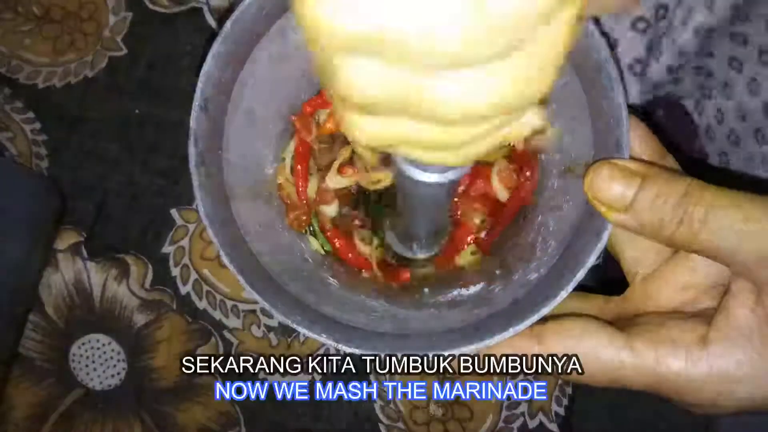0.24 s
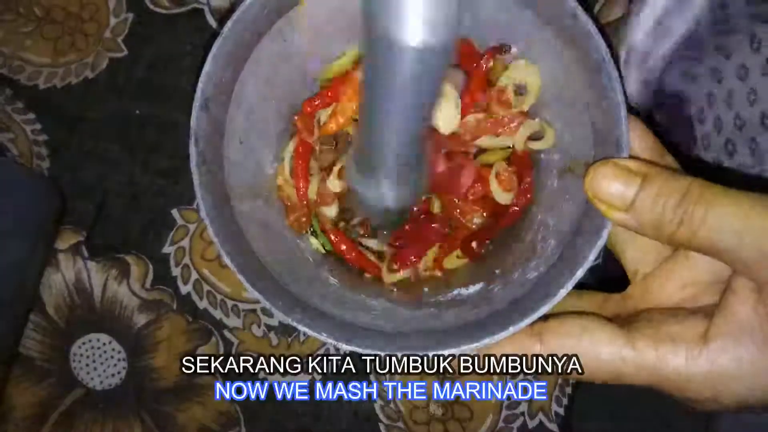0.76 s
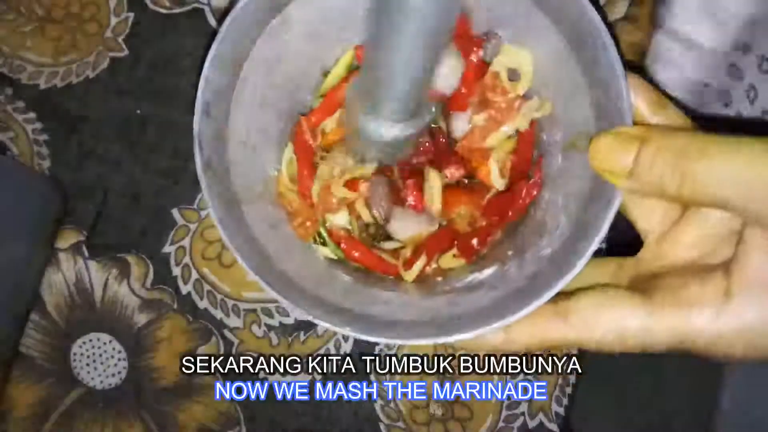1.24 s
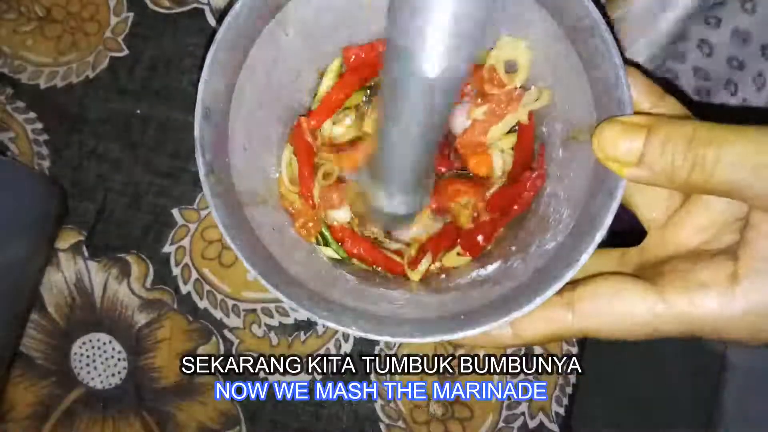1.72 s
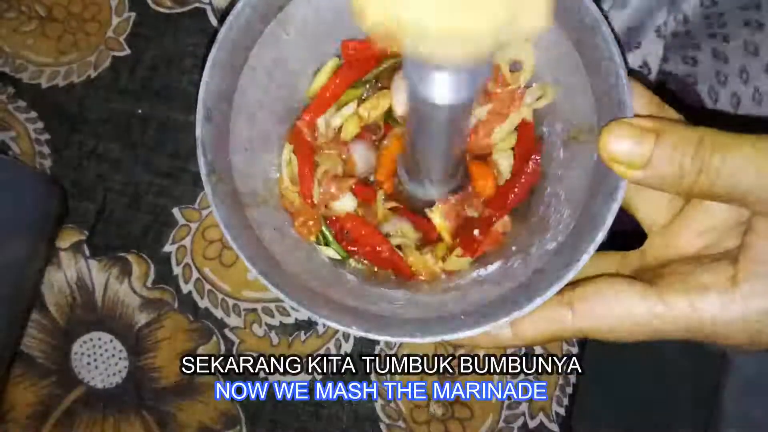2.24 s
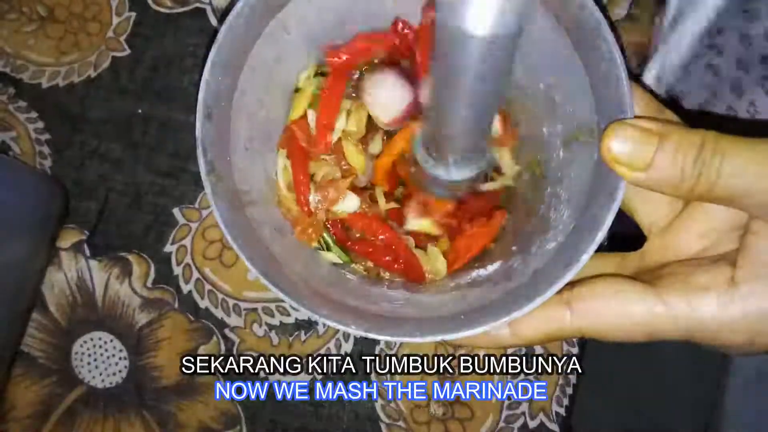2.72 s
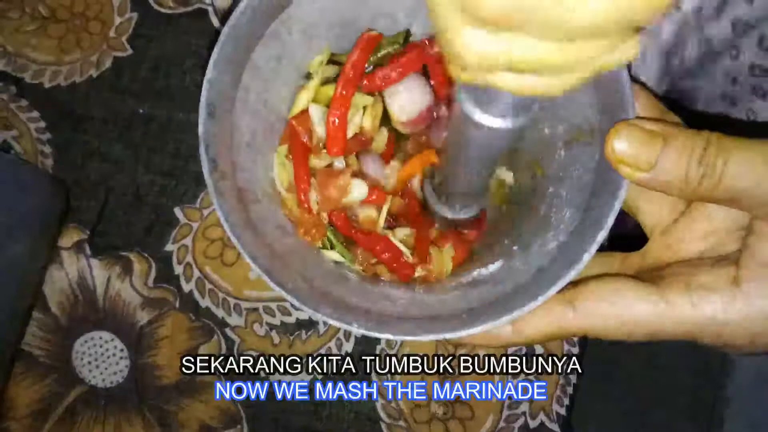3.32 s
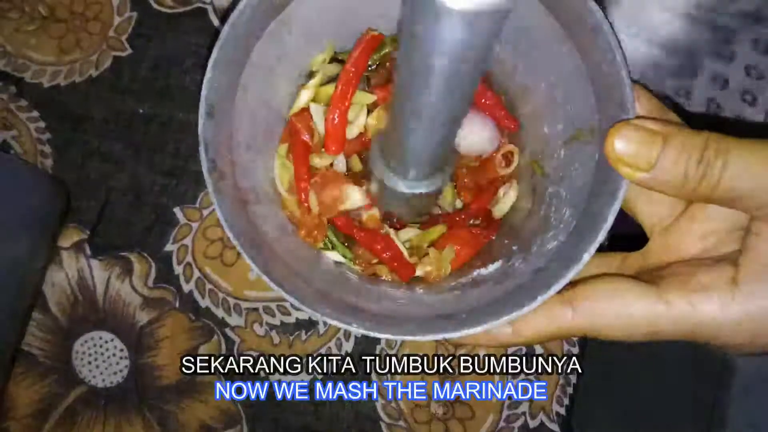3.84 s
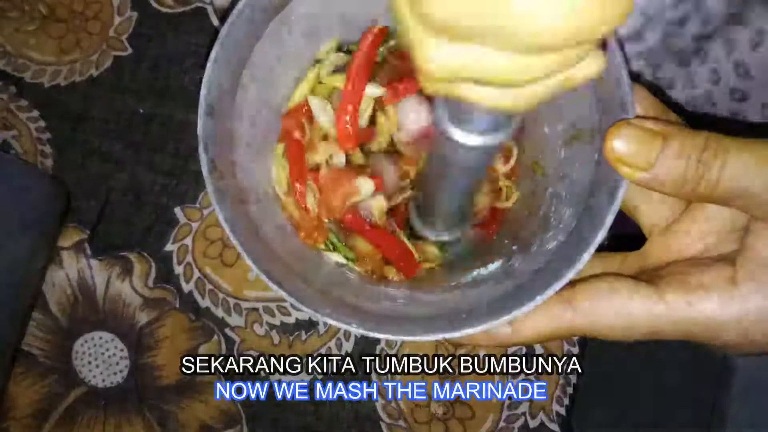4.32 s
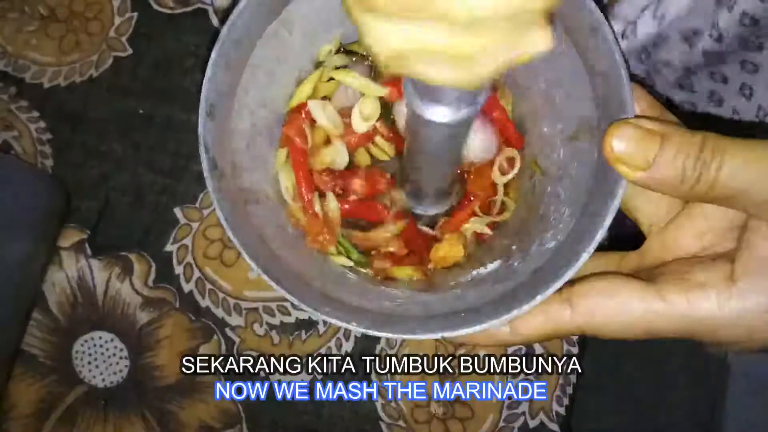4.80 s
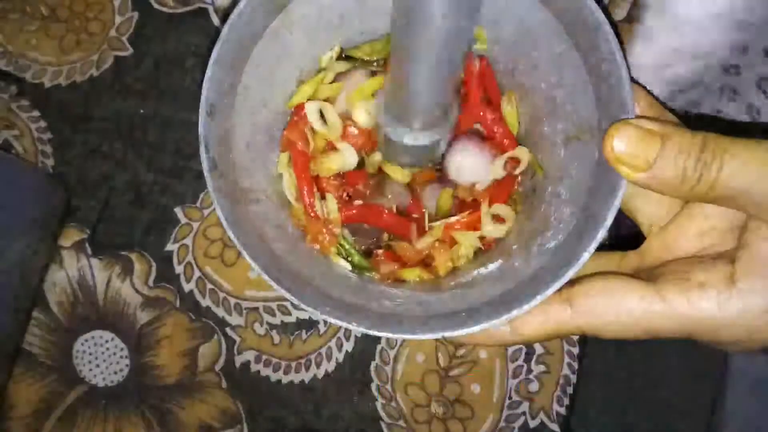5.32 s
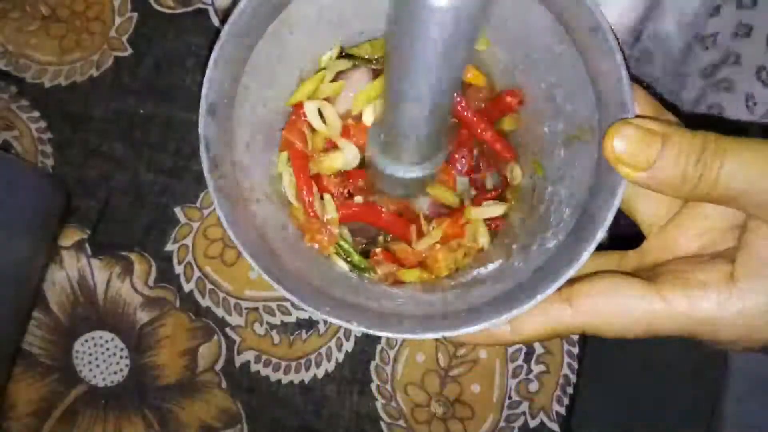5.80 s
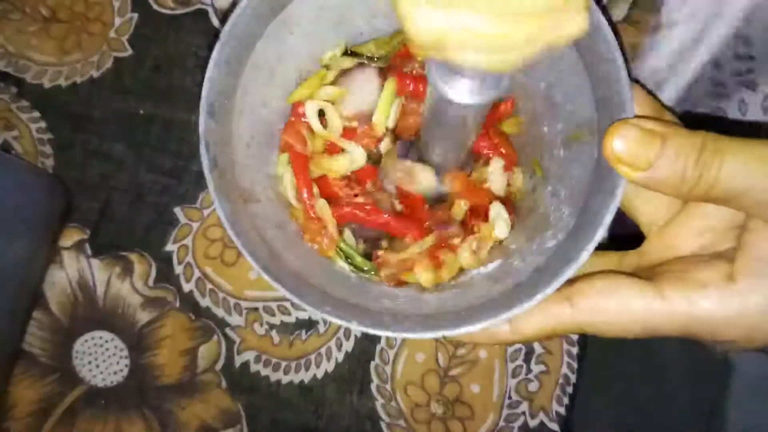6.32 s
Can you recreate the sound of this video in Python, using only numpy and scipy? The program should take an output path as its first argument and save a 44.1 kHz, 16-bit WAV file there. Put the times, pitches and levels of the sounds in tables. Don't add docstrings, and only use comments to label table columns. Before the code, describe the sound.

Steady hand pounding in a small, hard kitchen, heard close up. The tail of an earlier blow opens the scene, then a metal pestle strikes the mortar wall with a short, held-back ring. Regular thuds follow, each preceded by wet crunching and popping, with damped metallic clanks here and there. A clearer ring comes past the middle, and pounding continues to the end over constant hiss and short lively echoes.

```python
import sys
import numpy as np
from scipy import signal
from scipy.fft import irfft
from scipy.io import wavfile
from scipy.ndimage import uniform_filter1d

SR = 44100
rng = np.random.default_rng(int(sys.argv[2]) if len(sys.argv) > 2 else 0)


def transcribe(signal):
    frames = np.atleast_2d(signal).T
    limited = np.clip(frames, -1, 1)
    pcm = np.round(limited * 32767).astype(np.int16)
    wavfile.write(sys.argv[1], SR, pcm)


def rack_gain(trim_db):
    fader = np.asarray(trim_db, float)
    return 10 ** (fader / 20)


N = 289296
LEAD = SR // 4

# (time of greatest force [s], force [dB], contact time [ms],
# low floor mode share [dB], hardness [dB])
LANDINGS = [(-.125, 6, 4.65, -0.5, 9), (.238, -16.5, 2.3, -2, 5), (.275, -10, 4.7, 0.5, 3),
            (.6232, -1.5, 2.1, 1, 8.5), (.636, -2.5, 3.5, -10, -18), (1.047, -25, 5.16, 6.5, 7.5),
            (1.4226, -6.5, 4.16, -8.5, -5.5), (1.8092, -1.5, 3.68, -6, -1), (2.181, 0.5, 3.86, 2, 0.5),
            (2.579, -21.5, 4.3, 9, 4.5), (2.9333, 1.5, 2.48, -5, 11.5), (3.301, -18, 2.54, 7.5, 7),
            (3.650, -10.5, 3.06, 3.5, 1.5), (4.0062, 2.5, 3.87, 0, 0.5), (4.372, -5, 5.7, -3, 9),
            (4.733, 4, 2.89, -3.5, 12), (5.1568, 4, 4.4, -6, -5.5), (5.546, -21, 3.6, -4, 16),
            (5.918, -22, 5.2, 8.5, 10.5), (6.2803, 3, 4.1, -17, 8.5)]
# (time [s], force [dB], low floor mode share [dB])
TOUCHES = [(1.0655, -27, -20), (1.798, -11, 10.5), (2.162, -16, -1), (2.566, -13.5, -29),
           (3.276, -12.5, -3.5), (4.345, -10, -9), (4.711, -21.5, 6.5), (5.137, -14.5, 7), (5.147, -8, -14),
           (5.533, -17, 11), (5.903, -26.5, 10), (6.257, -14, 11)]
TOUCH_MS, TOUCH_HARDNESS_DB = 4.6, -18

FLOOR_HZ = [
    (62, 109, 129),
    (172, 213),
    (264, 292, 334, 408, 488, 545, 610),
    (691, 833),
]
FLOOR_SIGN = [(1, 1, -1), (1, 1), (-1, 1, -1, -1, 1, 1, -1), (1, -1)]
# (level [dB], time to fade by 60 dB [s])
FLOOR = [
    [(-5.5, 0.056), (3, 0.07), (-3.5, 0.099)],
    [(-2, 0.11), (-11, 0.079)],
    [(-26.5, 0.14), (-21, 0.082), (-19, 0.19), (-22, 0.074), (-22.5, 0.073), (-19, 0.04), (-20.5, 0.033)],
    [(-28.5, 0.27), (-34.5, 0.25)],
]
# (frequency [Hz], level [dB])
RATTLE = [(150, 11), (300, 13.5), (500, -1.5), (800, -3), (1200, -14.5), (2000, -19), (3500, -25),
          (8000, -34)]
RATTLE_T60 = 0.34
RATTLE_DB, RATTLE_PER_HARDNESS = -19.5, 0.71
LOW_LIMIT_HZ = 89.6

# (start [s], length [s], level [dB], swell [0 flat, 3 late])
SQUISH = [(.581, 0.031, -37.5, 1.01), (0.604, 0.015, -20.5, 2), (0.993, 0.059, -34, 0.087),
          (1.386, .029, -25.5, 1.3), (1.406, 0.017, -21, 1.8), (1.771, .045, -27.5, 0.2),
          (2.135, 0.052, -30.5, 0.54), (2.152, 0.027, -29, 0.26), (2.523, 0.06, -33.5, 0.042),
          (2.898, 0.026, -24, 0.51), (3.264, 0.05, -31, 0.11), (3.623, 0.03, -25.5, 0.16),
          (3.985, 0.033, -30.5, 0.66), (3.999, 0.0028, -17.5, 0.27), (4.701, .026, -21, 1.1),
          (5.107, 0.049, -25.5, 0.82), (5.503, 0.054, -28, 0.083), (5.883, 0.03, -29.5, 0.051),
          (6.243, 0.032, -29.5, 0.13)]
SQUISH_HZ = 3980
LUMP_DB, LUMP_S = 3.5, 0.0044
# (frequency [Hz], level [dB])
CRUNCH = [(350, -46), (600, 7.5), (858, 9.5), (1180, -3.5), (1660, 6), (3580, 1), (4400, 6), (5050, 1.5),
          (6200, 4.5), (9890, 3.5), (13200, -7.5), (14900, 7.5), (16000, -66)]
GRAIN_HZ = np.geomspace(900, 15000, 14)
# (time [s], peak [dB], pitch [Hz], high part against low [dB])
BURSTS = [(0.2536, -1, 2070, 10), (.614, -1, 2500, 0.5), (0.6186, -3, 3300, -9), (1.0145, -17, 2400, -4),
          (1.0243, -12.5, 2380, -2), (1.0324, -12, 2250, -10), (1.4135, -1.5, 2620, 1),
          (1.4164, -11, 2000, 5), (1.7835, -11.5, 3030, -2), (1.8, -8.5, 2380, -4), (1.807, -13, 3100, -9),
          (2.1683, -5, 1660, 2), (2.1714, -14, 3150, 2), (2.553, -13.5, 2160, 4), (2.9103, -24, 2240, 2),
          (2.9248, -3, 3100, 8), (3.273, -13, 1720, 14), (3.28, -6.5, 2720, 13), (3.2956, -7, 3700, -1),
          (3.6303, -11, 3100, -21), (3.636, -7.5, 1700, 4), (4.0003, -4, 2830, -3), (4.363, -4.5, 2460, -9),
          (4.7188, -11.5, 3020, -16), (5.5105, -13, 1660, -23), (5.889, -13, 2080, -29),
          (5.9194, -15, 3170, 0), (6.2542, -4.5, 2600, 2), (6.2578, -8, 1790, 8)]
# (time [s], peak [dB])
TICKS = [(.5916, -29), (.9928, -19.5), (1.0494, -33), (1.2645, -41), (1.388, -22), (1.421, -24),
         (2.157, -28), (2.5282, -21), (2.5334, -20), (2.5463, -20), (2.571, -17), (3.6464, -17),
         (3.854, -23), (4.8747, -29), (5.1103, -23), (5.1238, -20), (5.1457, -24), (5.244, -35),
         (5.457, -23), (5.536, -10), (5.551, -10), (5.9044, -26), (6.2784, -23)]
TICK_HZ, TICK_SPREAD, TICK_HIGH_DB = 2450, 0.45, 1.5
CRACK_T60 = 0.011
CAVITY_HZ = [4700, 6520, 9800]

# (time [s], contact click [dB], wash of crowded high modes [dB],
# time for the wash to fade by 60 dB [s], how freely the hand lets it ring [factor])
STRIKES = [
    (0.2339, -4, -22, 0.15, .8),
    (4.3331, -6, -21, 0.3, 1.27),
]
# (lower [Hz], upper [Hz])
BOWL_HZ = [(886, 893), (1680, 1708), (2085, 2099), (3793, 3804), (5225, 5265), (6015, 6060), (6270, 6330),
           (6485, 6517), (6680, 6700), (8120, 8150), (8600, 8620), (10120, 10150), (11050, 11250)]
# (first strike lower [dB], first strike upper [dB], second strike lower [dB],
# second strike upper [dB], time to fade by 60 dB [s])
BOWL = [(-22, -20, -30, -21, 0.4), (-38, -32, -36, -29, 0.3), (-30, -15, -30, -19.5, 0.43),
        (-35, -35, -27, -24, 0.32), (-38, -18, -41, -40, 0.06), (-34, -36, -36, -34, 0.083),
        (-12, -21, -10, -25, 0.04), (-31, -26, -42, -38, 0.39), (-40, -31, -30, -36, .2),
        (-38, -40, -40, -42, .2), (-34, -38, -26, -58, 0.033), (-41, -30, -46, -50, 0.097),
        (-39, -24, -23, -32, 0.088)]
# (frequency [Hz], level [dB])
WASH = [(500, -2.5), (1200, 4), (2300, 5.5), (3200, -8), (4700, -0.5), (6400, 4.5), (8000, -9), (10500, -4),
        (13300, -23), (15000, -5), (16500, -39)]
# (time [s], lowest mode [dB], third mode [dB])
CLANKS = [(1.004, -23.5, -34), (1.413, -30, -14), (1.42, -12, -1.5), (2.156, -15.5, -12), (2.910, -19, -33),
          (4.730, -7, -35), (5.511, -10, -36), (5.888, -21, -37), (6.247, -20, -34)]
CLANK_T60 = 0.028

# (frequency [Hz], level [dB])
OOZE = [(500, -27), (900, 8), (1800, -2.5), (3200, -3), (5000, -4), (8000, -20), (12000, -24), (16500, -59)]
# (frequency [Hz], width [Hz], level [dB])
OOZE_RINGS = [
    (1793, 95, 7.5),
    (3100, 250, 11.5),
]
OOZE_DB, OOZE_T60 = -37, 0.35

# (frequency [Hz], time to fade by 60 dB [s])
ROOM = [(60, 0.2), (160, 0.6), (420, 0.6), (1100, 0.61), (2900, 0.57), (7700, 0.65), (16000, 0.047)]
FLOOR_ECHO_DB, FOOD_ECHO_DB, METAL_ECHO_DB = -11, -16.5, -19
ECHO_START = 0.25

# (frequency [Hz], level [dB])
HISS = [(15, -40), (25, -0.5), (134, 5), (172, 4.5), (508, -9.5), (899, -18.5), (1000, -14), (1470, -9),
        (2260, -14.5), (6340, -1.5), (7670, -10), (10600, -7), (13200, -23.5), (15100, -9), (16400, -42)]
HISS_DB = -42
# (time [s], level [dB])
DIP = [
    (5.082, 0),
    (5.087, -8),
    (5.098, -8),
    (5.104, 0),
]
EDGE_HZ = 15750


def evened(x):
    return x / np.sqrt(np.mean(x ** 2) + 1e-20)


def read(points, hz):
    f, value = np.transpose(points)
    return np.interp(np.log(hz + 1), np.log(f + 1), value)


def add(mix, s, sound):
    part = mix[LEAD + round(s * SR):][:len(sound)]
    part += sound[:len(part)]


def ring(modes, t, signs):
    return sum(sign * rack_gain(db - 60 * t / t60) * np.sin(2 * np.pi * hz * t)
               for (hz, db, t60), sign in zip(modes, signs))


def coloured(x, points):
    gain = rack_gain(read(points, np.fft.rfftfreq(512, 1 / SR)))
    taps = np.roll(irfft(gain), 256) * np.hanning(512)
    return signal.oaconvolve(x, taps / np.linalg.norm(taps), "same")


def resonate(x, hz, width_hz):
    hz = np.clip(hz, 100, 16000)
    return signal.lfilter(*signal.iirpeak(hz, hz / width_hz, SR), x)


def thuds():
    out, t = np.zeros(LEAD + N), np.arange(SR // 2) / SR
    groups = []
    for pitches, rows, signs in zip(FLOOR_HZ, FLOOR, FLOOR_SIGN):
        modes = [(hz, *row) for hz, row in zip(pitches, rows)]
        groups.append(ring(modes, t, signs))
    low, mid, upper, top = groups
    t_rattle = t[:SR // 4]
    rattles = rng.standard_normal((len(blows()), SR // 4)) * rack_gain(-60 * t_rattle / RATTLE_T60)
    for (s, db, ms, low_db, hardness_db), rattle in zip(blows(), rattles):
        first_contact = s - ms / 2000
        count = max(round(ms * SR / 1000), 8)
        push = np.sin(np.pi * np.arange(count) / count) * np.pi / 2 / count
        thump = signal.oaconvolve(rack_gain(low_db) * low + mid, push)
        add(out, first_contact, rack_gain(db) * thump)
        knock = (rack_gain(hardness_db) * upper + top) * np.minimum(t / 0.018, 1)
        add(out, s, rack_gain(db) * knock)
        rattle_db = db + RATTLE_DB + RATTLE_PER_HARDNESS * hardness_db
        shaken = coloured(rattle * np.minimum(t_rattle / 0.0009, 1), RATTLE)
        add(out, first_contact, rack_gain(rattle_db) * shaken)
    return signal.sosfilt(signal.butter(3, LOW_LIMIT_HZ, "high", fs=SR, output="sos"), out)


def blows():
    return LANDINGS + [(s, db, TOUCH_MS, low_db, TOUCH_HARDNESS_DB) for s, db, low_db in TOUCHES]


def squish():
    out = np.zeros(LEAD + N)
    grains = wet_grains(len(out))
    lumps = evened(uniform_filter1d(rng.standard_normal(len(out)), round(LUMP_S * SR)))
    grains = grains * rack_gain(LUMP_DB * lumps)
    for s, length, db, swell in SQUISH:
        u = np.arange(round((length + 0.074) * SR)) / SR / length
        fade = rack_gain(-60 * np.maximum(u - 1, 0) * length / 0.031)
        shape = np.minimum(u, 1) ** swell * fade * np.minimum(u * 12, 1)
        raw = grains[LEAD + round(s * SR):][:len(u)]
        add(out, s, rack_gain(db) * shape * evened(1.5 * raw + resonate(raw, SQUISH_HZ, 3600)))
    return out


def wet_grains(count):
    size = rack_gain(2.15 * np.minimum(rng.exponential(1, count), 5))
    size = size * (rng.random(count) < 2400 / SR)
    pitch = rng.integers(0, len(GRAIN_HZ), count)
    pops = sum(resonate(size * (pitch == k), hz, 0.15 * hz) / np.sqrt(hz) for k, hz in enumerate(GRAIN_HZ))
    return coloured(evened(pops) + 0.92 * rng.standard_normal(count), CRUNCH)


def cracks():
    out, t = np.zeros(LEAD + N), np.arange(400) / SR
    tears = rng.standard_normal((len(BURSTS) + len(TICKS), len(t)))
    for (s, db, low_hz, high_hz, high_db), tear in zip(crack_rows(), tears):
        burst = tear * rack_gain(-60 * t / CRACK_T60) * np.minimum(t / 0.0021, 1)
        low = resonate(resonate(burst, low_hz, 940), low_hz, 940)
        high = resonate(resonate(burst, high_hz, 1270), high_hz, 1270)
        crack = low + rack_gain(high_db) * (high + 0.19 * coloured(burst, CRUNCH))
        add(out, s, rack_gain(db - 4.0) * crack / abs(crack).max())
    return out


def crack_rows():
    luck = rng.random((len(BURSTS) + len(TICKS), 2))
    rows = []
    for (s, db, hz, high_db), (_, b) in zip(BURSTS, luck):
        rows.append((s, db, hz, CAVITY_HZ[int(2 * b)], high_db))
    for (s, db), (a, b) in zip(TICKS, luck[len(BURSTS):]):
        hz = TICK_HZ * (1 + TICK_SPREAD * (2 * a - 1))
        rows.append((s, db, hz, CAVITY_HZ[int(len(CAVITY_HZ) * b)], TICK_HIGH_DB))
    return rows


def bowl():
    out, t = np.zeros(LEAD + N), np.arange(SR // 2) / SR
    noise = rng.standard_normal((len(STRIKES), len(t)))
    for strike, (s, click_db, wash_db, t60, free) in enumerate(STRIKES):
        modes = [(hz, row[2 * strike + k], free * row[4])
                 for pair, row in zip(BOWL_HZ, BOWL) for k, hz in enumerate(pair)]
        signs = np.resize([1, 1, -1], len(modes))
        add(out, s, ring(modes, t, signs) * np.minimum(t / 0.0039, 1))
        click, wash = rack_gain(click_db - 60 * t / 0.0078), rack_gain(wash_db - 60 * t / t60)
        add(out, s, coloured(noise[strike], WASH) * (click + wash))
    for s, first_db, third_db in CLANKS:
        modes = [(BOWL_HZ[0][1], first_db, 0.77 * CLANK_T60),
                 (0.976 * BOWL_HZ[2][0], third_db, 0.39 * CLANK_T60)]
        add(out, s, ring(modes, t, [1, 1]) * np.minimum(t / 0.0019, 1))
    return out


def ooze():
    strength, t = np.zeros(LEAD + N), np.arange(SR // 4) / SR
    for s, db, *_ in blows():
        add(strength, s, rack_gain(OOZE_DB + 0.47 * db - 60 * t / OOZE_T60) * np.minimum(t / 0.017, 1))
    pulp = coloured(wet_grains(len(strength)), OOZE)
    rings = sum(rack_gain(db) * resonate(pulp, hz, width_hz) for hz, width_hz, db in OOZE_RINGS)
    return strength * evened(pulp + rings)


def room(x):
    taps = np.zeros((3, SR))
    at = np.arange(300, SR - 20, 20) + rng.integers(0, 20, (3, (SR - 301) // 20))
    np.put_along_axis(taps, at, rng.choice([-1., 1.], at.shape), 1)
    hz, t, z = signal.stft(taps, SR, nperseg=512)
    fade = rack_gain(-60 * t / read(ROOM, hz)[:, None]) * np.minimum(ECHO_START + t / 0.02, 1)
    tails = signal.istft(z * fade, SR, nperseg=512)[1]
    turn = 2 * np.pi * (0.9 * np.arange(len(x)) / SR + np.arange(3)[:, None] / 3)
    shares = x * np.sqrt(2 / 3) * np.cos(turn)
    wet = signal.fftconvolve(shares, tails / np.linalg.norm(tails[0]), axes=1)
    return wet.sum(0)[:len(x)]


def hiss():
    frames, hz = N // 256 + 5, np.fft.rfftfreq(1024, 1 / SR)
    a, b, patches = rng.standard_normal((frames, 513, 3)).T
    patches = evened(uniform_filter1d(uniform_filter1d(patches, 20, 0), 10, 1))
    z = (a + 1j * b) * rack_gain(read(HISS, hz)[:, None] + 1.16 * patches)
    return rack_gain(HISS_DB) * evened(signal.istft(z, nperseg=1024, noverlap=768)[1][:N])


def scene():
    low = thuds()
    food = squish() + cracks() + ooze()
    metal = bowl()
    wet = room(rack_gain(FLOOR_ECHO_DB) * low + rack_gain(FOOD_ECHO_DB) * food + rack_gain(METAL_ECHO_DB) * metal)
    return ((low + food + metal + wet)[LEAD:] + hiss())[None]


def top_cut(x):
    return signal.sosfilt(signal.butter(12, 16820, fs=SR, output="sos"), x)


def record(dry):
    s, db = np.transpose(DIP)
    dipped = dry * rack_gain(np.interp(np.arange(N) / SR, s, db))
    full = dipped / (1 + abs(dipped) ** 10) ** (1 / 10)
    low_pass = signal.firwin(767, EDGE_HZ, window=("kaiser", 8), fs=SR)
    mix = signal.oaconvolve(full, low_pass[None], "same")
    return top_cut(mix)


dry = scene()
out = record(dry)
transcribe(out)
```